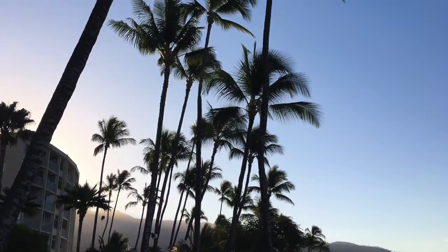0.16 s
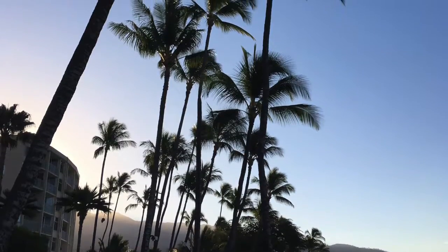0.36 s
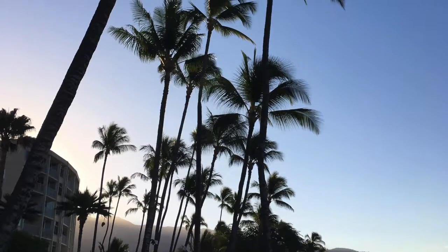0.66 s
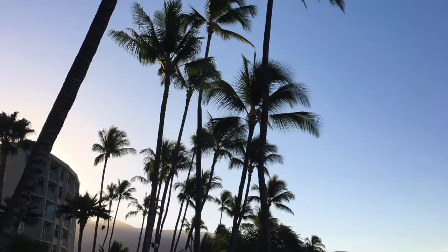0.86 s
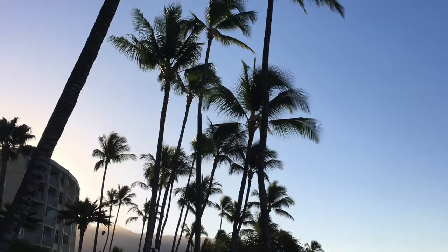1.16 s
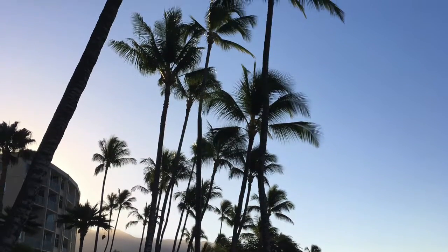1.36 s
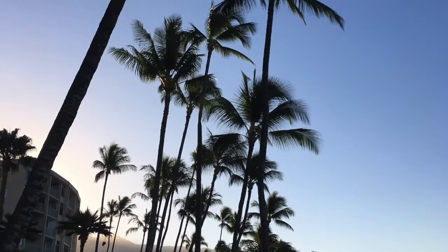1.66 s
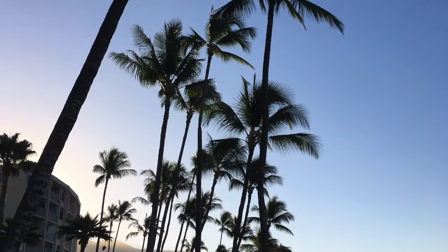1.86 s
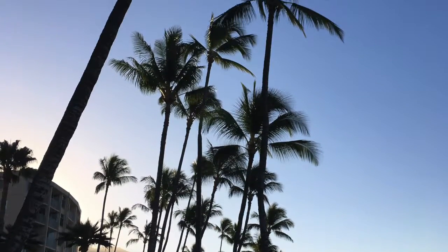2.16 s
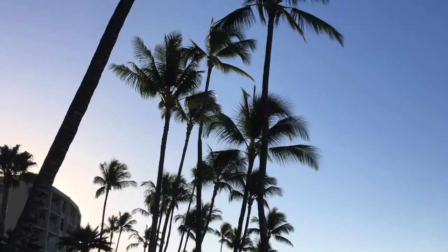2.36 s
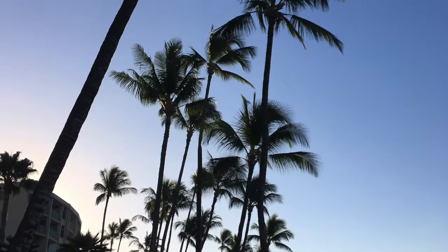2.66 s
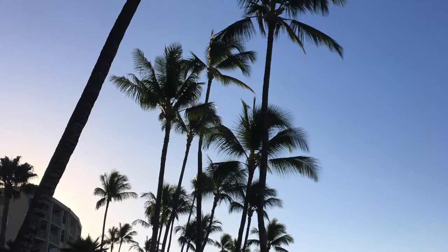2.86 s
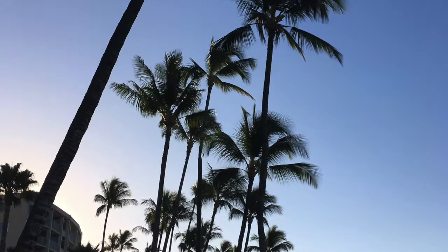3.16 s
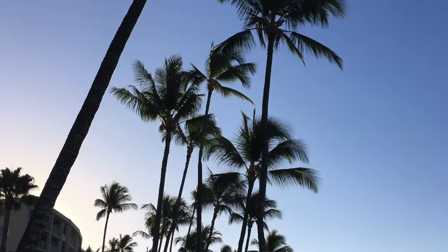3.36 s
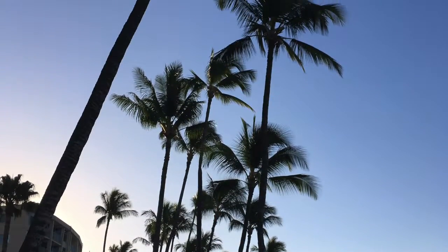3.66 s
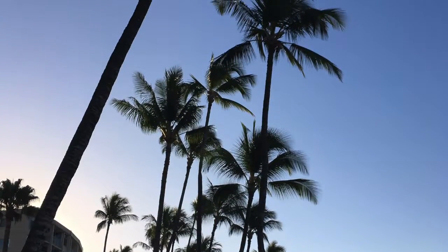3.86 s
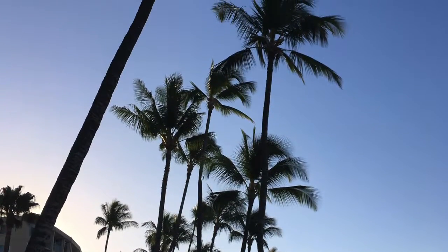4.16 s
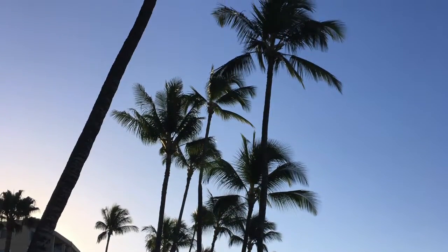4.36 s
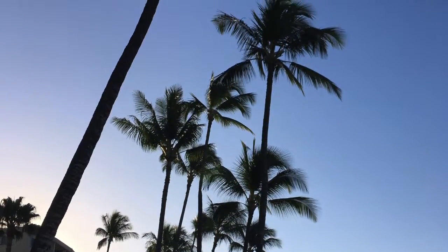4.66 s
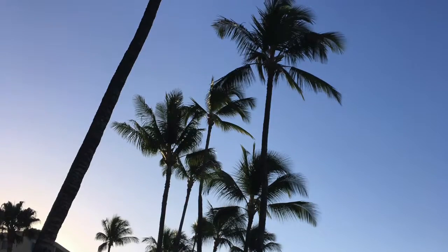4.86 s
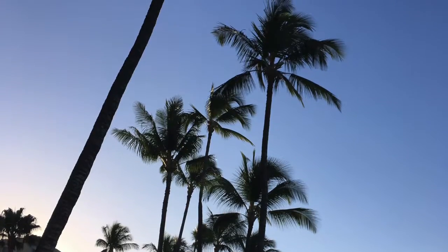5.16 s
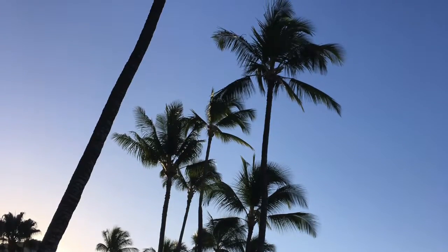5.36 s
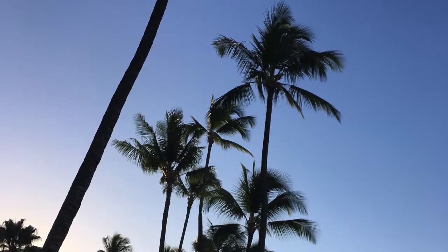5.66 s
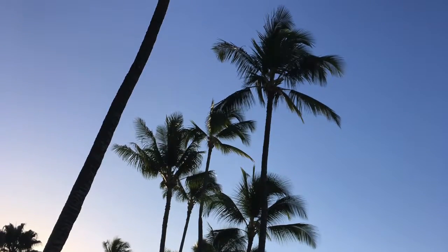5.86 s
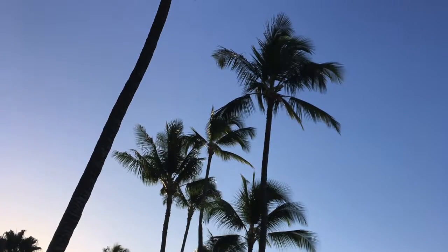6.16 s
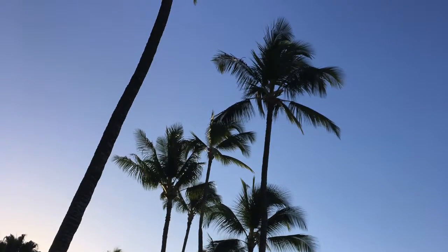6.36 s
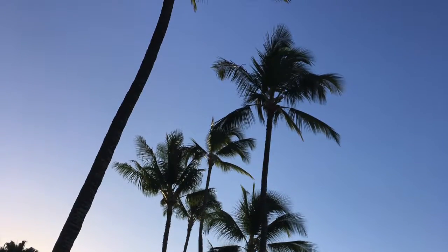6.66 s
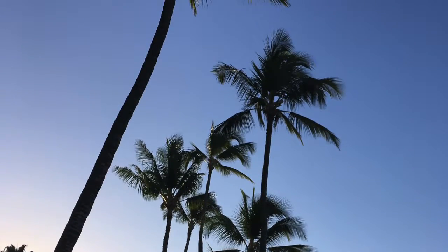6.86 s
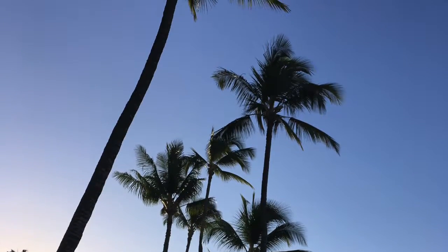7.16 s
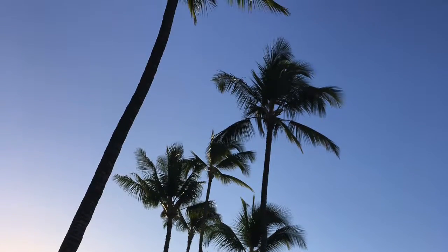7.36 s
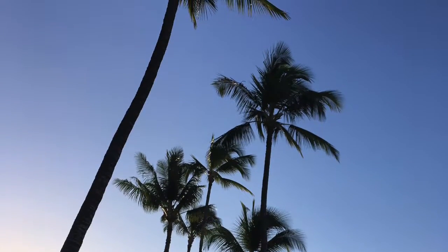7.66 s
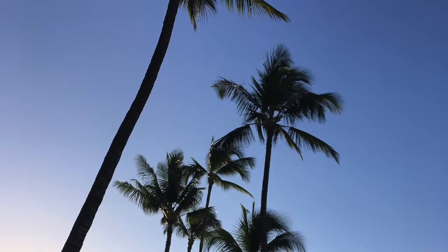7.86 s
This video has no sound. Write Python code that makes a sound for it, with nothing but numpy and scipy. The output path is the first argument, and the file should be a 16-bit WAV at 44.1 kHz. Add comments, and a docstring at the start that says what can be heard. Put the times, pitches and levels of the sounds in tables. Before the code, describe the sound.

Many birds in tall palms whistle, chirp and rasp over one another, echoing off a building, above a faint steady machinery hum.

```python
"""Dawn chorus among palms

Birds in tall palms beside a large building whistle, slur and rasp over one another. Each call is a
sine wave on a pitch curve, with overtones and a chance shake that makes it hoarse. Nearer birds stand
out from a loose far crowd; walls and trees throw the calls back as scattered echoes. Distant machinery
drones underneath as shaped noise with wavering fan tones, and everything fades out at the end."""
import sys
import numpy as np
from scipy import signal
from scipy.fft import rfft, irfft, next_fast_len
from scipy.io import wavfile

SR = 44100
rng = np.random.default_rng(int(sys.argv[2]) if len(sys.argv) > 2 else 0)


def transcribe(signal):
    """Save signal, clipped to [-1, 1], as a 16-bit WAV file at the path in sys.argv[1]."""
    frames = np.atleast_2d(signal).T
    limited = np.clip(frames, -1, 1)
    pcm = np.round(limited * 32767).astype(np.int16)
    wavfile.write(sys.argv[1], SR, pcm)


N = 354123
TIME = np.arange(N) / SR  # s

# Bird calls: t is the start; levels are those of the call itself, before echoes and mixing. Hooks: a note lifts
# (or droops, if negative), drops quickly and lands lower. t/s, hold/s, drop/s, lift/octaves, top f/Hz, landing
# f/Hz, top level/dB, landing level/dB, roughness/0-1, added overtone level/dB
HOOK_CALLS = [(0.3, 0.066, .092, 0.21, 3260, 2154, -51.5, -48.5, 0.26, -2.5),
              (0.581, 0.06, 0.065, 0.25, 3013, 2200, -51, -59, 0.21, -2),
              (0.864, 0.05, 0.092, 0.27, 3387, 2103, -49, -49, 0.03, -1),
              (1.41, 0.012, 0.044, -0.0042, 3460, 2980, -57.5, -49.5, 0.2, -4),
              (1.558, 0.076, 0.034, 0.11, 3005, 2200, -50.5, -63.5, 0.57, -5),
              (1.788, 0.013, 0.062, -0.017, 4170, 2965, -58, -50, 0.25, -27),
              (1.86, 0.054, .042, -0.036, 3303, 2000, -52, -60.5, 0.36, -3),
              (2.066, 0.042, 0.075, 0.081, 4115, 2990, -55, -44.5, 0.47, -0.5),
              (2.754, 0.058, .075, 0.048, 4190, 2918, -54.5, -44, 0.35, 1),
              (4.4, 0.02, 0.06, -.05, 3490, 2604, -58.5, -49.5, 0.4, -0.5),
              (4.582, 0.05, 0.082, -0.0079, 5230, 3074, -58, -43, .42, 2.5),
              (5.164, .025, 0.053, -0.062, 4380, 2450, -54.5, -48, 0.16, 0.5),
              (5.43, 0.058, 0.054, -0.0067, 2887, 2210, -51.5, -57.5, 0.41, -4.5),
              (5.892, 0.067, 0.031, -0.032, 3333, 2150, -56, -51.5, 0.58, -1.5),
              (6.099, 0.06, 0.07, -0.12, 4150, 2920, -54.5, -45.5, 0.3, 1)]
# how sharply the drop levels out, and how rounded its top is
HOOK_CURVE, HOOK_SHOULDER = 6, 1.3
# dip in mid-drop and swell on the way up
HOOK_DIP_DB, HOOK_SWELL_DB = 3.5, 1
# share of roughness lost on landing, and share of the drop spread evenly over its whole length
HOOK_CLEARS, HOOK_SAG = .4, 0.17

# Slides: a level note tips over and glides down.
# t/s, hold/s, slide/s, top f/Hz, end f/Hz, top level/dB, end level/dB, roughness/0-1,
# added overtone level/dB
SLIDE_CALLS = [(0.951, 0.043, .24, 4615, 2320, -57, -52, 0.06, 3.5),
               (3.048, 0.012, 0.21, 4645, 2396, -48, -49, 0.04, 1.5),
               (3.138, .018, 0.053, 4790, 4300, -57.5, -59, 0, -4),
               (3.305, 0.005, 0.049, 2375, 2090, -50, -54.5, 0.09, 8),
               (3.591, 0.05, 0.16, 3450, 2270, -55, -48.5, 0.13, 0),
               (3.916, .005, 0.086, 2400, 1790, -50.5, -58.5, 0.18, 3),
               (4.834, 0.048, 0.12, 3190, 2078, -49.5, -54.5, 0.74, -1.5),
               (4.937, .005, 0.073, 2047, 1710, -56, -52, .35, -1),
               (5.275, .005, 0.1, 2310, 1930, -52, -60, 0, 3),
               (6.17, .008, 0.065, 2500, 1746, -57.5, -62, 0.18, -0.5),
               (6.558, 0.045, 0.062, 3050, 2420, -59.5, -65, 0.37, -11),
               (6.644, .008, .09, 2310, 1848, -67.5, -64, 0.16, 3.5),
               (7.014, 0.056, 0.13, 2996, 1975, -60, -69, 0.2, -8)]
SLIDE_CURVE, SLIDE_SHOULDER = 2, 1.5  # a slide tips over and levels out only gently
# how much the pitch quavers while a slide or a hook is falling
SLIDE_QUAVER, HOOK_QUAVER = .028, .055

# Whips, steep downward sweeps: t/s, length/s, start f/Hz, end f/Hz, level/dB
WHIP_CALLS = [(.372, .03, 2998, 2340, -56), (2.425, 0.09, 6980, 2490, -51), (2.61, 0.024, 3600, 2200, -53),
              (2.72, 0.04, 3100, 2050, -53), (2.878, 0.098, 6200, 1950, -52.5),
              (3.345, 0.1, 6800, 2700, -51.5), (3.412, .028, 3500, 1900, -48),
              (4.204, 0.022, 5100, 3580, -51), (4.279, .022, 2907, 2133, -54),
              (4.666, .035, 3518, 2353, -49)]
WHIP_ROUGH, WHIP_JITTER, WHIP_BRIGHT_DB, WHIP_SWELL_DB = .45, .115, -1, 3.5

# Pips, clear and nearly level: t/s, length/s, f/Hz, level/dB
PIP_CALLS = [(0.051, 0.038, 2488, -53.5), (.73, 0.2, 4850, -74), (.862, 0.014, 3080, -49),
             (1.433, 0.16, 5010, -73), (1.794, 0.049, 2680, -55.5), (2.215, 0.018, 2025, -59),
             (2.495, 0.086, 2306, -57.5), (2.672, 0.067, 6600, -67.5), (2.676, 0.062, 3290, -55.5),
             (3.097, 0.043, 2880, -50), (3.152, 0.043, 3030, -51.5), (3.337, 0.075, 3160, -48.5),
             (3.542, 0.048, 3220, -48), (3.52, 0.067, 2193, -57), (3.622, 0.047, 2054, -46.5),
             (3.682, 0.02, 2810, -49), (3.775, 0.092, 2150, -57), (4.0, 0.049, 3335, -48),
             (4.018, 0.049, 2726, -44), (4.07, 0.05, 2860, -52.5), (4.179, 0.051, 3110, -52),
             (4.222, 0.036, 5080, -52), (4.248, 0.046, 2020, -51.5), (4.452, 0.046, 2590, -49.5),
             (4.589, 0.054, 5210, -56.5), (4.78, 0.064, 2765, -51), (4.99, 0.032, 2220, -54.5),
             (5.092, 0.098, 4480, -62), (5.252, 0.049, 3007, -50.5), (5.527, 0.041, 2160, -54),
             (6.328, 0.067, 5400, -65.5), (6.467, 0.12, 2276, -66), (6.845, 0.041, 5100, -68.5),
             (7.128, .05, 3590, -68)]
PIP_FALL_OCTAVES, PIP_ROUGH, PIP_BRIGHT_DB = 0.035, 0.2, -4

# Rasps, hoarse and sagging: t/s, length/s, f/Hz, level/dB
RASP_CALLS = [(.01, 0.087, 2480, -58.5), (0.593, 0.076, 2396, -55), (2.197, 0.071, 2993, -55.5),
              (2.559, .06, 3700, -55.5), (2.637, .04, 3790, -57), (3.006, 0.06, 3600, -54),
              (3.008, 0.046, 5350, -58.5), (3.202, .07, 3400, -56.5), (3.282, 0.07, 3445, -51.5),
              (3.438, 0.05, 3230, -59), (4.059, 0.075, 1888, -55), (4.178, 0.044, 2070, -53.5),
              (4.217, 0.084, 3200, -54), (4.358, 0.067, 2404, -53), (4.502, 0.052, 3120, -53.5),
              (4.505, 0.12, 2054, -55.5), (4.598, 0.067, 5940, -59.5), (4.672, 0.026, 2540, -50),
              (6.059, 0.053, 2633, -55.5), (6.8, 0.067, 3550, -62.5), (6.815, .06, 2460, -65.5),
              (6.819, 0.05, 5430, -68)]
RASP_FALL_OCTAVES, RASP_ROUGH, RASP_BRIGHT_DB = .22, 0.623, -4

# A soft low note that one bird repeats: t/s, level/dB
LOW_CALLS = [(.09, -64), (0.657, -62.5), (1.252, -64), (2.497, -63), (2.675, -66), (3.18, -59.5),
             (3.435, -58), (4.29, -59.5)]
LOW_S, LOW_HZ, LOW_FALL_OCTAVES, LOW_ROUGH, LOW_BRIGHT_DB = 0.073, 1637, .13, 0.3, -4.5

# Arches, whistles that rise and ease down again:
# t/s, length/s, top f/Hz, rise and fall/octaves, level/dB
ARCH_CALLS = [(1.659, 0.059, 3520, 0.058, -58), (2.011, 0.075, 3975, 0.142, -51.5),
              (2.41, 0.03, 3900, 0.13, -55), (3.773, 0.1, 3150, 0.058, -47.5),
              (3.885, .075, 3130, 0.033, -54.5), (4.324, .05, 4450, 0.039, -60.5),
              (4.815, 0.11, 3616, 0.18, -51), (5.7, .095, 3197, 0.11, -63)]
ARCH_ROUGH, ARCH_BRIGHT_DB = .1, -4

# Screeches, harsh scolding in a wide hiss of pitch: t/s, length/s, centre f/Hz, level/dB
SCREECH_CALLS = [(1.44, 0.066, 2360, -56.5), (1.871, 0.073, 2920, -55), (3.368, 0.056, 4490, -55.5),
                 (3.559, .17, 4300, -54.5), (3.76, 0.17, 3650, -52), (3.83, .11, 5300, -58.5),
                 (4.391, 0.053, 3500, -52.5), (4.568, .1, 4300, -55), (5.143, 0.066, 3700, -58),
                 (5.162, 0.072, 5740, -60.5), (5.217, .09, 2817, -55)]
SCREECH_ROUGH, SCREECH_JITTER, SCREECH_FALL_OCTAVES, SCREECH_BRIGHT_DB = .7, .17, .12, -2
FAST_SHAKE_HZ = 507  # shake of screeches and whips

# Twitters, runs of quick flicks: t/s, length/s, first f/Hz, last f/Hz, level/dB
TWITTER_CALLS = [(3.235, .06, 2950, 2600, -49.5), (3.591, 0.072, 3380, 3450, -55),
                 (3.869, 0.07, 3000, 2400, -52), (4.206, .12, 2600, 2200, -55),
                 (4.485, 0.074, 2820, 2950, -54.5), (4.638, 0.063, 3617, 2700, -47),
                 (4.926, 0.093, 3244, 2150, -52)]
SYLLABLE_S, SYLLABLE_ON = 0.023, 0.7  # repeat time, and the share of it that sounds
SYLLABLE_FALL_OCTAVES, TWITTER_ROUGH, TWITTER_BRIGHT_DB = 0.24, 0.32, -3

# Basic strength of a bird's overtones, by where they fall in pitch: f/Hz, level/dB
OVERTONE_LEVELS = [(3000, -19), (4500, -18), (5500, -24.5), (6400, -14.5), (7400, -19), (8400, -18),
                   (9300, -27), (11000, -45)]
# share of a perfectly clear note spent swelling and fading, and depth of a rasp's throb
SOFT_SHARE, FLUTTER = .25, 1.25
# every note trembles in loudness: typical depth, and rate
TREMBLE_DB, TREMBLE_HZ = 1.8, 55

# Loudness of the far flock before echoes and mixing: t/s, level/dB
FLOCK_LEVEL = [(0, -68.5), (1.2, -63), (1.9, -57.5), (2.35, -57), (2.7, -63.5), (3.0, -54), (3.3, -54.5),
               (3.8, -50), (4.1, -57), (4.4, -53.5), (4.7, -52.5), (5.08, -70.5), (5.4, -74.5), (5.7, -82),
               (6.2, -59.5), (6.6, -76), (7.4, -89)]
# Time the scattered echoes take to die by 60 dB: f/Hz, ring time/s
ECHO_RING = [(1500, 1), (3000, 0.81), (5000, 0.94), (9000, 0.56)]
# Tone colour of distant machinery and open air: f/Hz, relative level/dB per Hz
DRONE_COLOUR = [(25, -34.5), (60, -26), (95, -12.5), (125, -1.5), (180, -1), (230, 5.5), (340, -2),
                (620, -3), (850, -10.5), (1400, -11.5), (2600, -7.5), (4500, -20.5), (7000, -25.5),
                (9500, -41.5)]
DRONE_DB = -59
# Wavering fan tones: f/Hz, level/dB
FAN_TONES = [(215, -74), (298, -74), (614, -72), (996, -79.5), (1287, -90)]
# The closing fade: t/s, level/dB
FADE_OUT = [(6.85, 0), (7.05, -3), (7.2, -8), (7.33, -12.5), (7.41, -19), (7.45, -34), (7.47, -100)]
EDGE_HZ = 9850  # top of the sound's band


def near_birds(kinds, count=5):
    """The calls that stand out from the chorus, shared among a few perches."""
    perches = np.zeros((count, N))
    for call, rows in kinds:
        for k, (s, *shape) in enumerate(rows):
            add(perches[k % count], s, call(*shape))
    return perches


def hook(hold, drop, lift, top_hz, landing_hz, top_db, landing_db, rough, bright_db, duller_db=6):
    """Swells towards its top, dips as it drops, and lands as a purer tone that still sags."""
    early, sharp = descent(hold, drop, HOOK_CURVE, HOOK_SHOULDER)
    even = descent(hold, drop, 1, 1)[1]
    height = (1 - HOOK_SAG) * sharp + HOOK_SAG * even
    hz = landing_hz * (top_hz / landing_hz) ** height * 2 ** (-lift * early ** 2)
    db = landing_db + (top_db - landing_db) * height
    db -= HOOK_DIP_DB * np.sin(np.pi * height)
    db -= HOOK_SWELL_DB * (early - .5) * height
    clearing = rough * (1 - HOOK_CLEARS * (1 - height))
    return note(hz, db, clearing, bright_db - duller_db * (1 - height), quaver=HOOK_QUAVER)


def slide(hold, drop, top_hz, end_hz, top_db, end_db, rough, bright_db, duller_db=7):
    """A level note that tips over and slides down, its overtones weakening."""
    height = descent(hold, drop, SLIDE_CURVE, SLIDE_SHOULDER)[1]
    hz = end_hz * (top_hz / end_hz) ** height
    db = end_db + (top_db - end_db) * height
    return note(hz, db, rough, bright_db - duller_db * (1 - height), quaver=SLIDE_QUAVER)


def whip(length, start_hz, end_hz, db):
    """One fast, breathy sweep downwards that swells as it falls."""
    hz = np.geomspace(start_hz, end_hz, int(length * SR))
    swelling = db + WHIP_SWELL_DB * np.linspace(-.5, .5, len(hz))
    return note(hz, swelling, WHIP_ROUGH, WHIP_BRIGHT_DB,
                jitter=WHIP_JITTER, quaver=.02, rasp_hz=FAST_SHAKE_HZ)


def pip(length, hz, db):
    """A short clear whistle, its pitch sinking only slightly."""
    return note(glide(length, hz, PIP_FALL_OCTAVES), db, PIP_ROUGH, PIP_BRIGHT_DB)


def rasp(length, hz, db):
    """A hoarse squawk, shaken by chance, that sags in pitch."""
    return note(glide(length, hz, RASP_FALL_OCTAVES), db, RASP_ROUGH, RASP_BRIGHT_DB)


def low_note(db):
    """A soft low note with the same length and sinking pitch curve each time."""
    return note(glide(LOW_S, LOW_HZ, LOW_FALL_OCTAVES), db, LOW_ROUGH, LOW_BRIGHT_DB)


def arch(length, top_hz, octaves, db):
    """A clear whistle that rises to its top and eases down."""
    u = np.linspace(-1, 1, int(length * SR))
    return note(top_hz * 2 ** (-octaves * u ** 2), db, ARCH_ROUGH, ARCH_BRIGHT_DB)


def screech(length, hz, db):
    """The syrinx (a bird's voice box) shakes so hard that the pitch smears into a wide band."""
    return note(glide(length, hz, SCREECH_FALL_OCTAVES), db, SCREECH_ROUGH, SCREECH_BRIGHT_DB,
                jitter=SCREECH_JITTER, rasp_hz=FAST_SHAKE_HZ)


def twitter(length, first_hz, last_hz, db):
    """A quick run of syllables, each a downward flick with a short gap after it."""
    t = np.arange(int(length * SR)) / SR
    progress = np.minimum(t / SYLLABLE_S % 1 / SYLLABLE_ON, 1)  # through each syllable, 0 to 1
    hz = np.geomspace(first_hz, last_hz, len(t)) * 2 ** (SYLLABLE_FALL_OCTAVES * (.5 - progress))
    pulses = evened(np.sin(np.pi * progress))
    return note(hz, db, TWITTER_ROUGH, TWITTER_BRIGHT_DB, quaver=0) * pulses


def note(hz, db, rough, bright_db, jitter=0.0986, quaver=.035, rasp_hz=240,
         under_db=-17, half_db=-14, wheeze_db=-18, rolloff_db=2.5):
    """One note: a whistle follows a pitch curve; an unsteady syrinx turns it into a rasp."""
    n = len(hz)
    rates = (rasp_hz, rasp_hz, 1400, TREMBLE_HZ)
    shake, throb, air, tremble = (wander(rate, size=next_fast_len(2 * n))[:n] for rate in rates)
    # a wide slur is never quite smooth
    unsteady = jitter * rough + quaver * abs(np.gradient(np.log(hz))) * n / 2
    phase = 2 * np.pi * np.cumsum(hz * (1 + unsteady * shake)) / SR
    voice = np.sin(phase) * (1 + rough * gain_of(wheeze_db) * air)
    for k in range(2, 5):
        overtone_db = read(OVERTONE_LEVELS, k * hz) + bright_db - rolloff_db * (k - 2.5)
        low_enough = k * hz < SR / 3
        voice += gain_of(overtone_db) * (1 + rough) * low_enough * np.sin(k * phase)
    # in a harsh note strong and weak cycles alternate: lines half way between the harmonics
    voice += rough * gain_of(under_db) * np.sin(phase / 2)
    between = np.sin(phase + phase / 2) + 0.5 * np.sin(2 * phase + phase / 2)
    voice += rough * gain_of(half_db) * between
    # whistles start crisply; rasps swell in and throb
    swell = signal.windows.tukey(n, np.clip(SOFT_SHARE + np.mean(rough) / 2, 0, 1))
    swell = swell * np.exp(FLUTTER * rough * np.tanh(throb))
    return gain_of(db) * evened(voice * swell * gain_of(TREMBLE_DB * tremble))


def glide(length, hz, fall):
    """Pitch curve that sinks evenly through hz by fall octaves."""
    return hz * 2 ** (fall * np.linspace(.5, -.5, int(max(length, .01) * SR)))


def descent(hold, drop, curve, shoulder):
    """For a hold, then a drop: share of the hold still to go, and height above the end (1 to 0)."""
    t = np.arange(int((hold + drop) * SR)) / SR
    early = np.clip(1 - t / hold, 0, 1)
    dropped = np.clip((t - hold) / drop, 0, 1)
    return early, (1 - dropped ** shoulder) ** curve


def far_flock(count=340, centre_hz=2700, spread=.36, fall=0.1783, uneven_db=2.0, bright_db=-2):
    """Short, mostly falling notes, clear or hoarse, scattered in time and pitch."""
    out = np.zeros(N)
    for k, (when, span, rough, height) in enumerate(rng.random((count, 4))):
        slope, size = rng.standard_normal(2)
        hz = centre_hz * np.exp(spread * (2 * height - 1))
        pitch = glide(.012 + .025 * span, hz, fall * (1 + slope))
        call = note(pitch, uneven_db * size, .8 * rough, bright_db)
        add(out, (k + when) / count * N / SR, call)
    return evened(out) * level(FLOCK_LEVEL)


def slaps(x, count=4, first_s=.006, last_s=.038, loss_db=7):
    """A few distinct reflections off the building that double each call, later ones weaker."""
    out = np.zeros(N)
    for k, (place, sign) in enumerate(rng.random((count, 2))):
        late = (k + place) / count
        reflection = np.sign(sign - .5) * gain_of(-loss_db * late) * x
        add(out, first_s + (last_s - first_s) * late, reflection)
    return out / np.sqrt(count)


def grounds(x, near_walls=1.2, walls_s=0.12):
    """Scattered echoes: strong early ones from near trunks and walls, then a tail that dies by pitch."""
    taps = np.zeros(SR)
    at = np.arange(200, SR - 20, 20)
    taps[at + rng.integers(0, 20, len(at))] = rng.standard_normal(len(at))
    hz, t, bands = signal.stft(taps, SR, nperseg=256)
    decay = gain_of(-60 * t / read(ECHO_RING, hz)[:, None])
    early_boost = 1 + near_walls * np.exp(-t / walls_s)
    tail = signal.istft(bands * decay * early_boost, SR, nperseg=256)[1]
    return signal.fftconvolve(x, tail / np.linalg.norm(tail))[:N]


def machinery(waver_hz=2.5, unsteady_db=3.5):
    """A low rush of air, made of shaped noise, with fan tones wavering in pitch and loudness."""
    colour = gain_of(read(DRONE_COLOUR, np.fft.rfftfreq(N, 1 / SR)))
    rush = irfft(rfft(rng.standard_normal(N)) * colour, N)
    tones = np.zeros(N)
    for hz, db in FAN_TONES:
        pitch = hz + waver_hz * wander(6.1, size=N)
        tone = np.sin(2 * np.pi * np.cumsum(pitch) / SR)
        tones += gain_of(db) * evened(tone * gain_of(unsteady_db * wander(4.5, size=N)))
    return gain_of(DRONE_DB) * evened(rush) + tones


def wander(rate_hz, size):
    """Smooth chance of rms 1 (average strength) that changes up to about rate_hz times a second."""
    hz = np.fft.rfftfreq(size, 1 / SR)
    chance = rng.spawn(1)[0].standard_normal(size)
    return evened(irfft(rfft(chance) / np.sqrt(1 + (hz / rate_hz) ** 4), size))


def gain_of(db):
    """Decibels to amplitude."""
    return 10 ** (np.asarray(db) / 20)


def evened(x):
    """Scaled to rms 1."""
    return x / np.sqrt(np.mean(x ** 2) + 1e-20)


def read(points, hz):
    """A table's value at hz, on a log-frequency axis."""
    f, value = np.transpose(points)
    return np.interp(np.log(hz + 1), np.log(f + 1), value)


def level(curve):
    """A curve of t/s, level/dB as a gain for every sample."""
    return gain_of(np.interp(TIME, *np.transpose(curve)))


def add(mix, s, sound):
    """Mixes a sound in at time s."""
    part = mix[max(0, round(s * SR)):][:len(sound)]
    part += sound[:len(part)]


def scene(direct_db=-2.5, slap_db=-4.0, echo_db=-2, open_direct_db=-1.3, open_echo_db=-4,
          far_direct_db=-2, far_echo_db=-2):
    """Birds arrive direct and echoed, each perch with its own echoes; pips are the most direct."""
    sheltered = near_birds([
        (hook, HOOK_CALLS), (slide, SLIDE_CALLS), (whip, WHIP_CALLS), (rasp, RASP_CALLS),
        (low_note, LOW_CALLS), (arch, ARCH_CALLS), (screech, SCREECH_CALLS), (twitter, TWITTER_CALLS)])
    near = np.zeros(N)
    for perch in sheltered:
        near += gain_of(direct_db) * perch
        near += gain_of(slap_db) * slaps(perch)
        near += gain_of(echo_db) * grounds(perch)
    clear = np.zeros(N)
    for perch in near_birds([(pip, PIP_CALLS)], count=2):
        clear += gain_of(open_direct_db) * perch + gain_of(open_echo_db) * grounds(perch)
    flock = far_flock()
    far = gain_of(far_direct_db) * flock + gain_of(far_echo_db) * grounds(flock)
    return (near + clear + far + machinery())[None]


def record(dry):
    """The fade-out, then a low-pass filter that removes the highest treble."""
    low_pass = signal.firwin(401, EDGE_HZ, window=("kaiser", 9), fs=SR)
    return signal.oaconvolve(dry * level(FADE_OUT), low_pass[None], "same")


dry = scene()
out = record(dry)
transcribe(out)
```